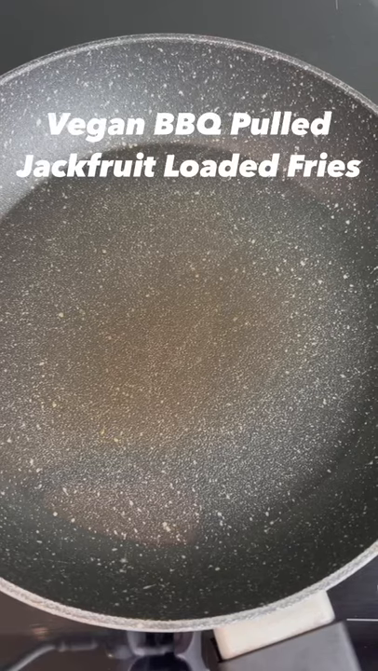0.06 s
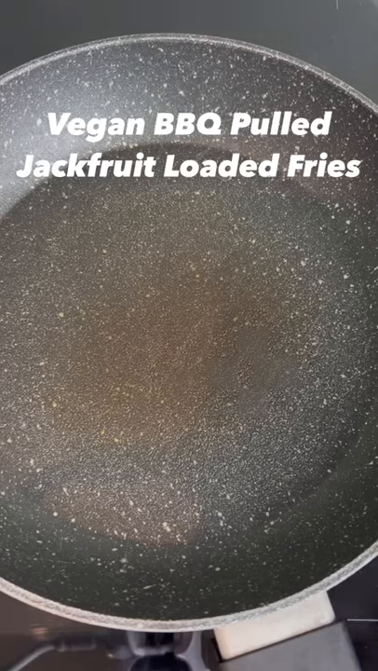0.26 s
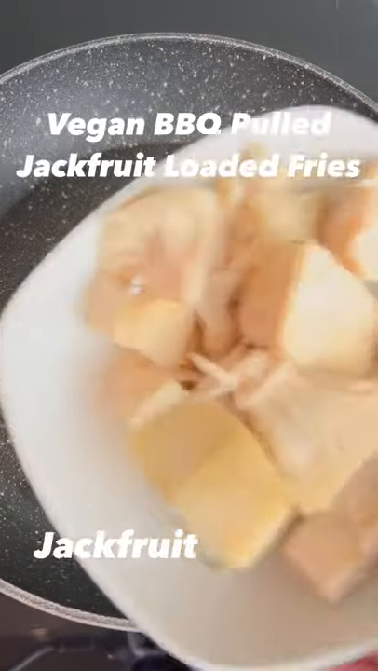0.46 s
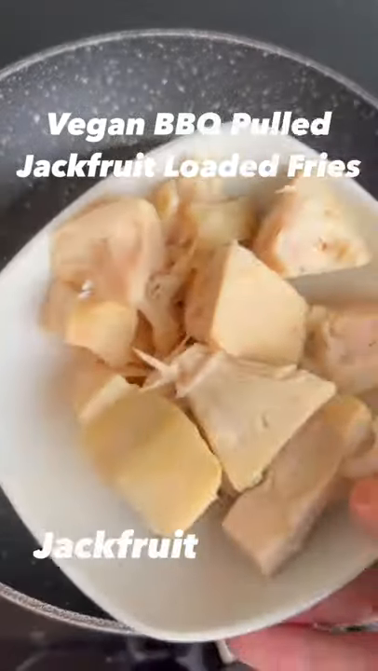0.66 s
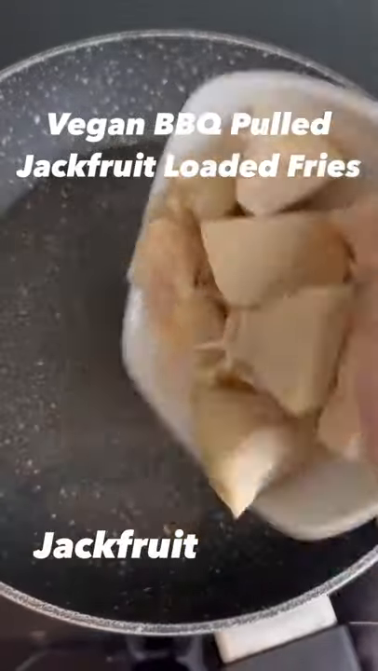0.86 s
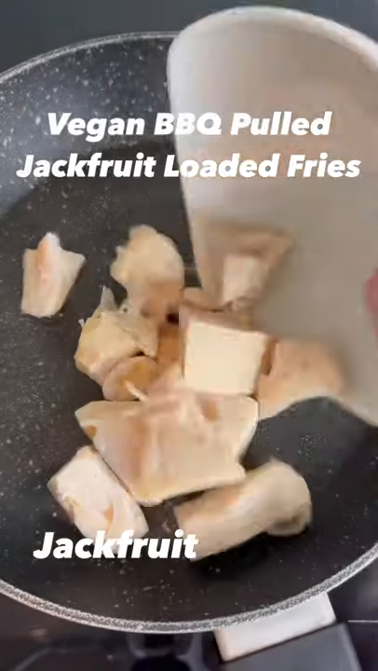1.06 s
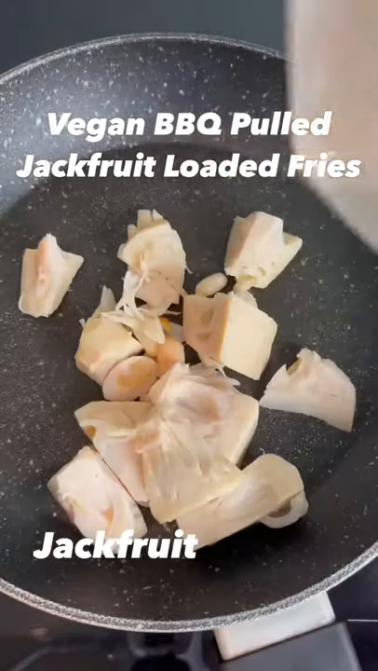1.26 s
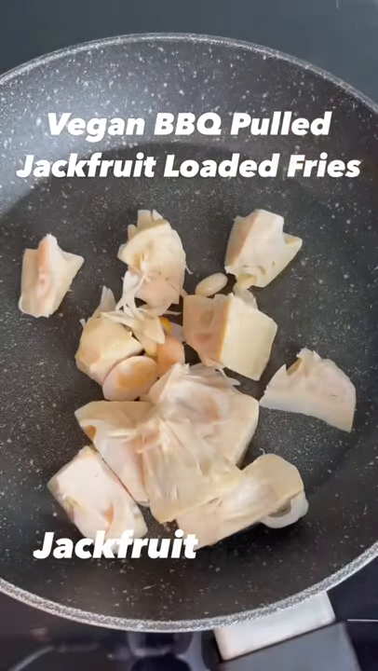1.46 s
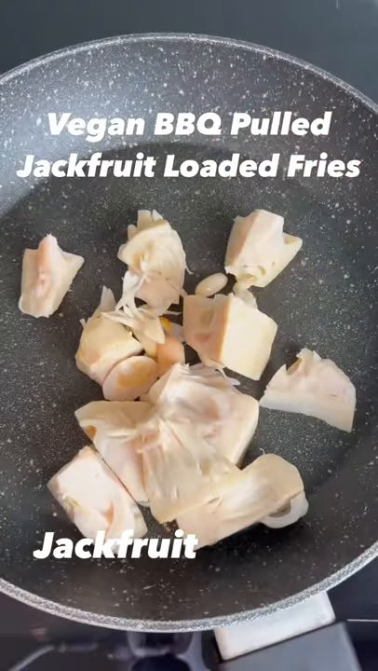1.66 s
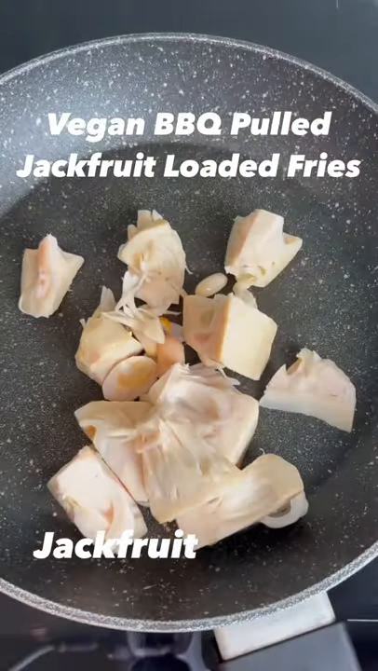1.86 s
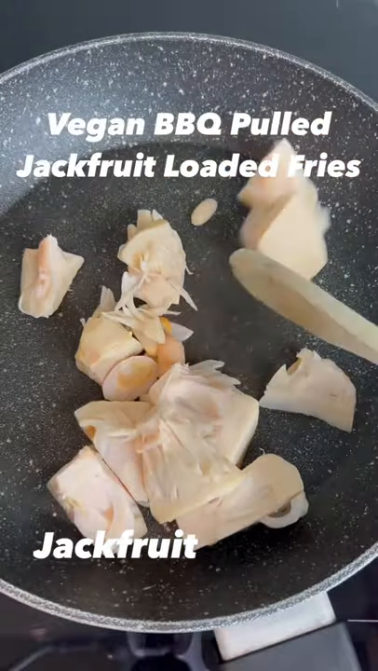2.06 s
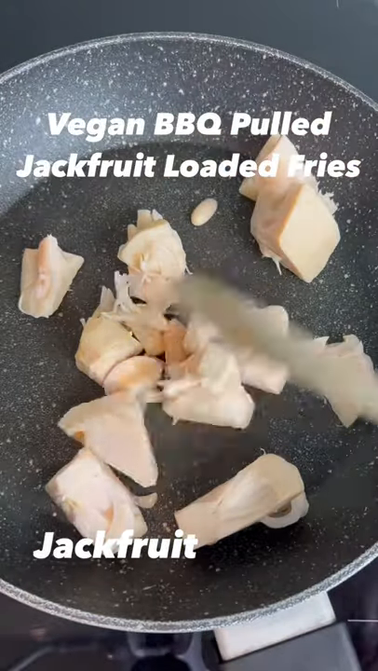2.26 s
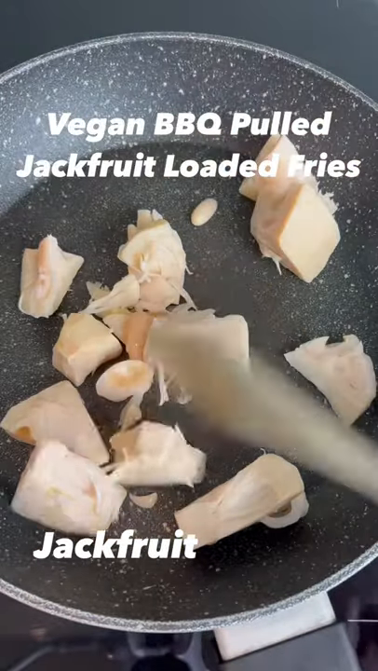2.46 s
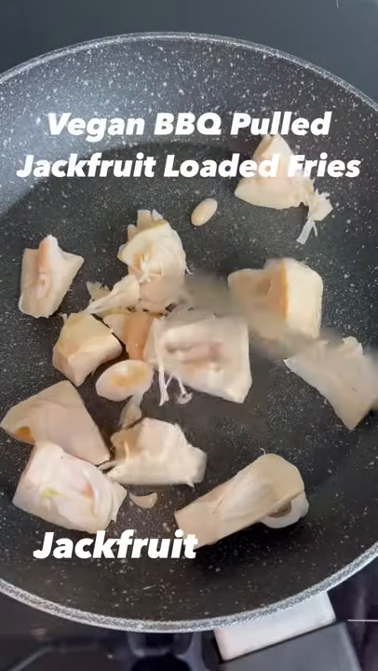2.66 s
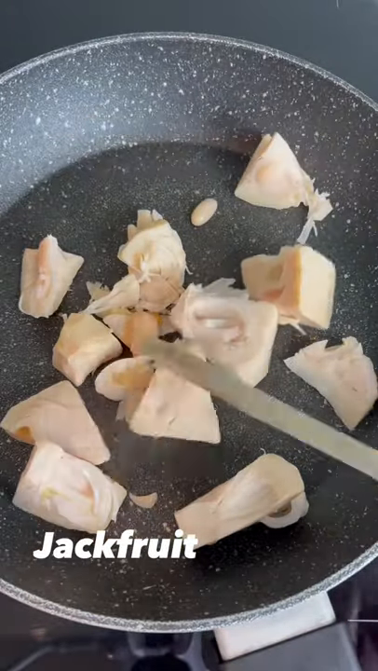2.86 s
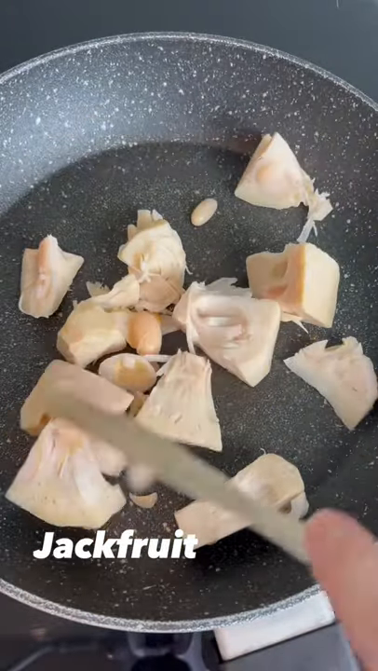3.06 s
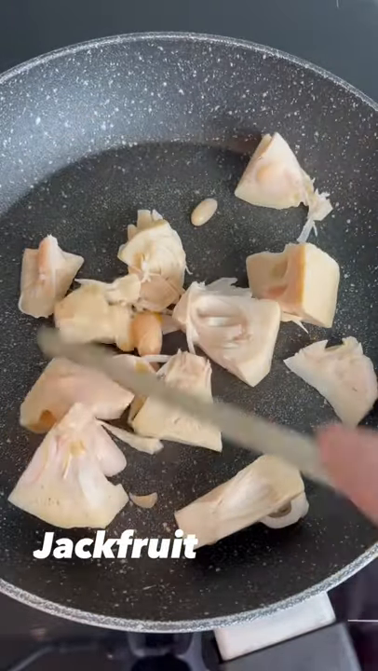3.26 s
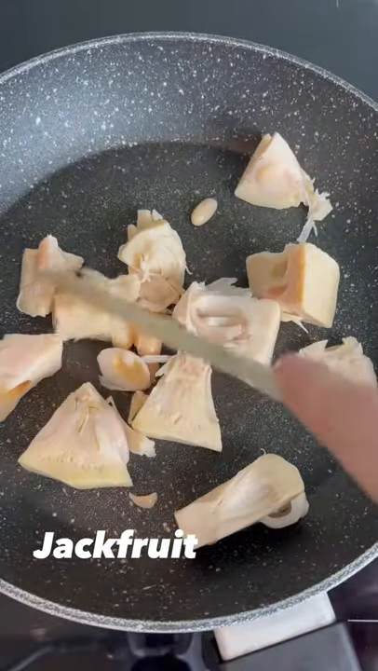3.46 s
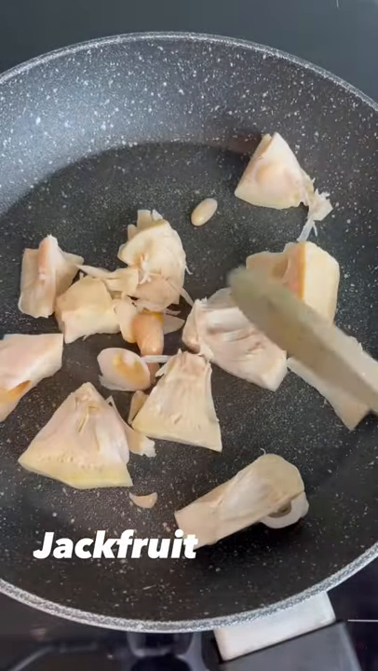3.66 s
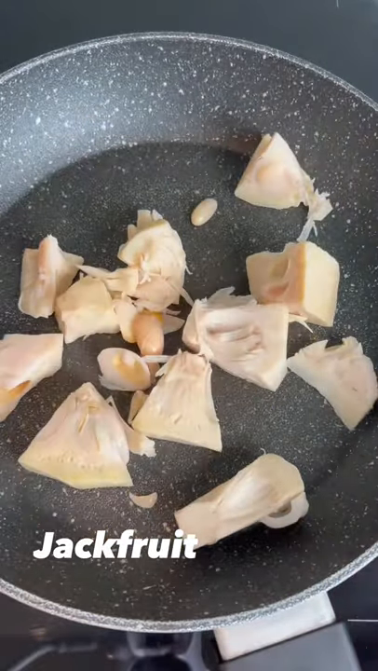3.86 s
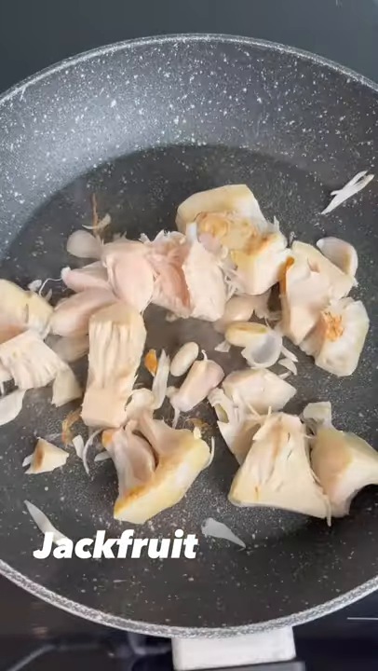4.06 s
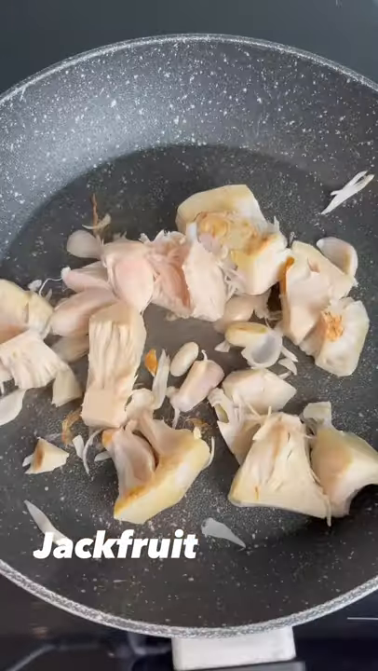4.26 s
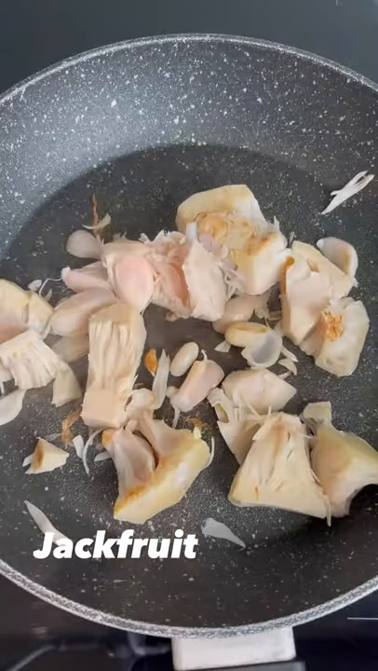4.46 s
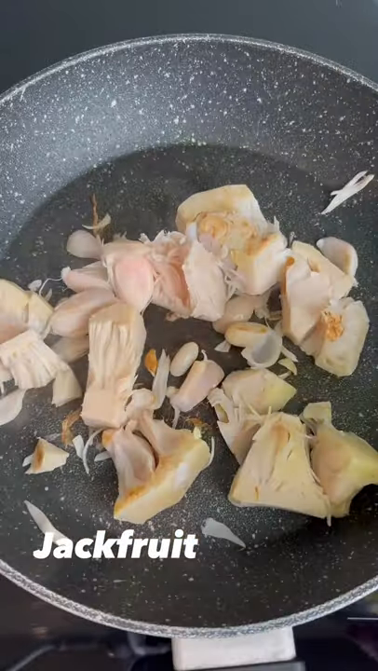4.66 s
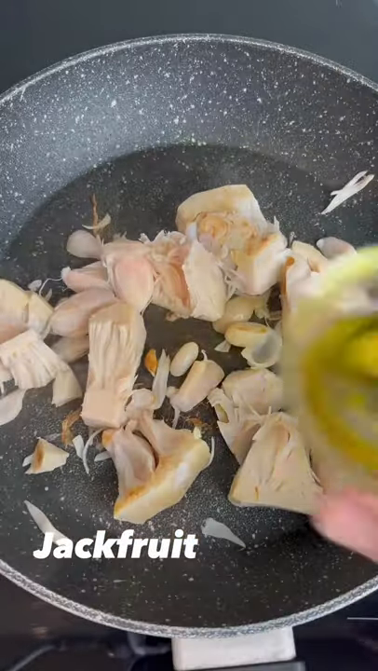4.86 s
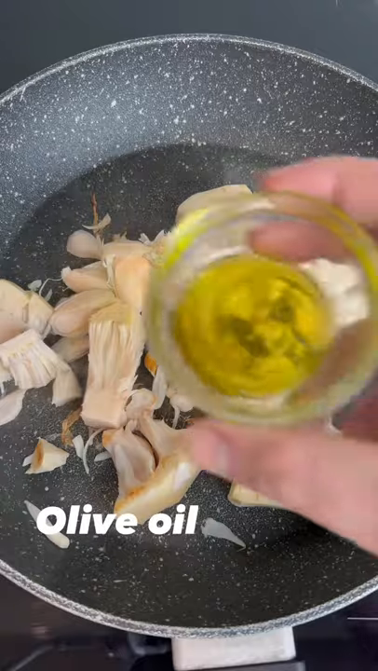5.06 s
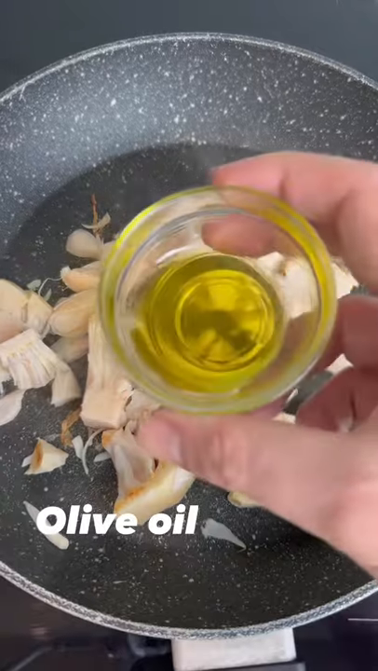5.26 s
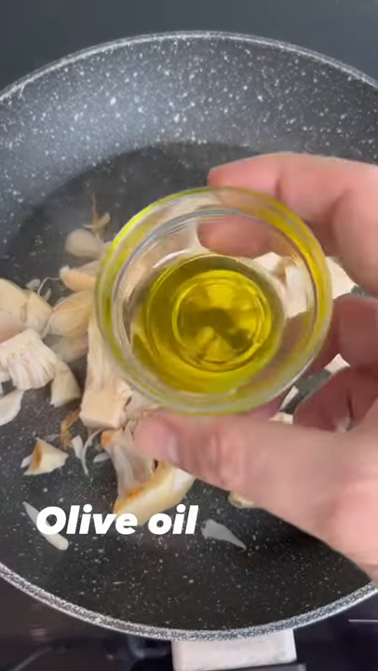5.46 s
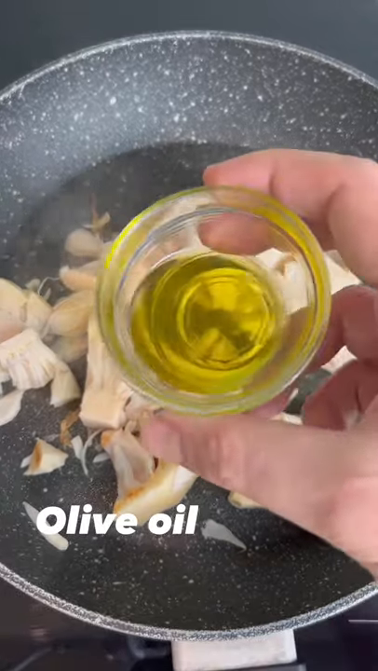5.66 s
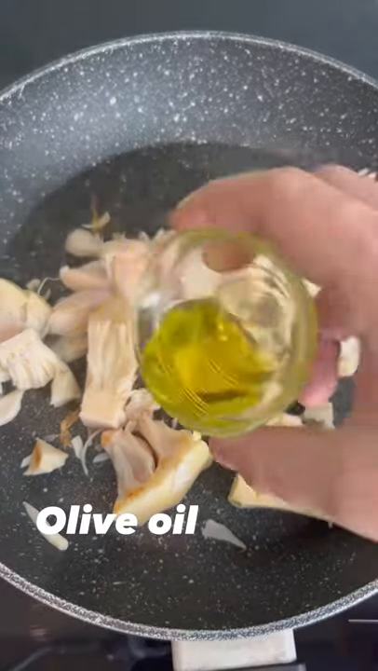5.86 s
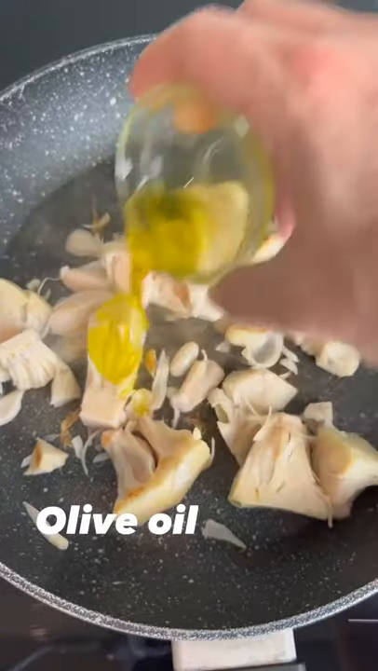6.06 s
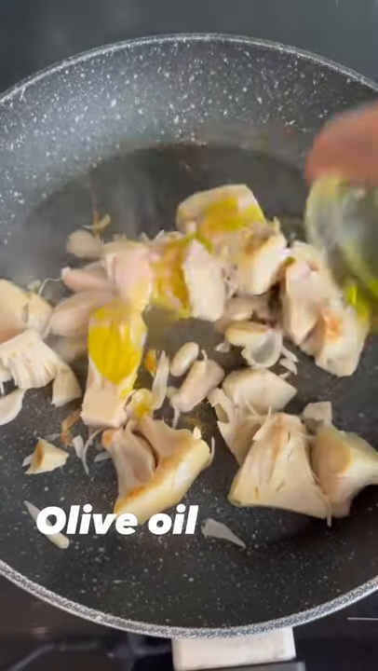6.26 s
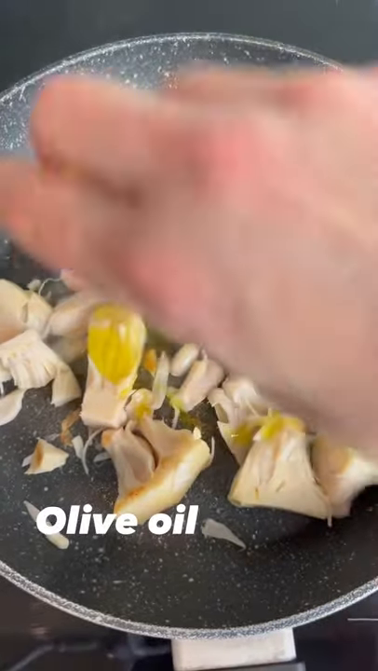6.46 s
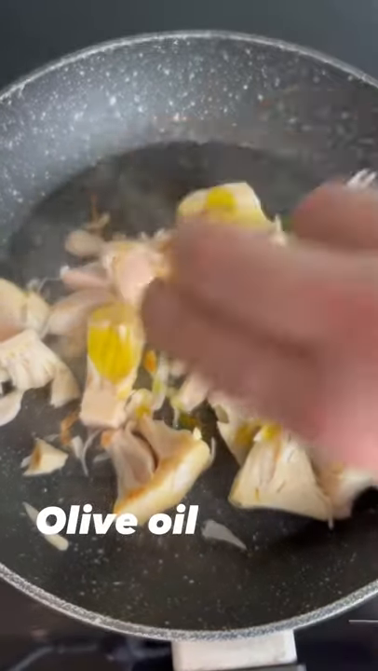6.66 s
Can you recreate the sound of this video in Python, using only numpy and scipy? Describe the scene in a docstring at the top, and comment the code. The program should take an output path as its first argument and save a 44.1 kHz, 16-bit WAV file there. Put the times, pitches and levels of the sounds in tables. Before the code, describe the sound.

A humming, faintly buzzing hob, very close up, with barely audible handling at first. Moist chunks tumble into a pan with muffled low bumps and instant, dense, hissing fry, full of sharp crackles and thin whistling steam. The sizzle drops abruptly at a cut, swells as pieces are moved, then drops again as low fan noise appears. It simmers down until fresh oil revives a spitting, uneven sizzle to the end.

```python
"""Three shots: in the first, over a humming, buzzing hob, soft rustling comes before wet food thuds into a
pan and sizzles; then come stirring and, with a fan running in the last shot, a late flare under oil.
Frying is steam-burst clicks over hiss, with spits and ringing bubbles; squeals are resonant noise, thuds are
decaying pan tones; hum, buzz and fan mix tones with shaped noise. The sizzle is wide only in some bands;
near 12 kHz the centre ends, leaving only the out-of-phase part in the top treble."""
import sys
import numpy as np
from scipy import signal
from scipy.fft import rfft, irfft, next_fast_len
from scipy.io import wavfile
from scipy.ndimage import uniform_filter1d, map_coordinates

SR = 44100
rng = np.random.default_rng(int(sys.argv[2]) if len(sys.argv) > 2 else 0)


def unload_audio(sound):
    """Save the sound as a 16-bit wav file, at the path given as the first command line argument."""
    columns = np.transpose(np.atleast_2d(sound))
    # keep every value between -1 and 1, then stretch to whole-number steps
    steps = np.round(np.clip(columns, -1, 1) * 32767)
    wavfile.write(sys.argv[1], SR, steps.astype(np.int16))


N = 295911
T = np.arange(N) / SR

# how hard the pan boils as food lands, is stirred, calms and flares: (time [s], relative fizz level [dB])
FRYING_LEVEL = [(0.958, -76), (0.971, -45), (0.98, -43), (0.993, -40.5), (1.006, -33.5), (1.045, -34),
                (1.11, -29), (1.27, -27.5), (1.92, -31), (1.94, -39.5), (2.0, -37), (2.15, -41.5),
                (2.25, -36), (2.285, -35.5), (2.305, -31.5), (2.325, -36), (2.5, -38.5), (2.67, -35.5),
                (3.14, -36), (3.16, -33), (3.45, -36), (4.02, -38), (4.05, -44.5), (4.57, -41.5),
                (5.65, -46), (6.08, -45.5), (6.264, -38), (6.278, -39.5), (6.32, -40), (6.35, -37.5),
                (6.39, -36.5), (6.415, -40), (6.445, -34.5), (6.48, -37.5), (6.51, -35), (6.57, -35.5),
                (6.6, -35.5), (6.63, -33.5), (6.66, -34.5), (6.71, -35.5)]
# sizzle colour in the centre, then out of phase: (frequency [Hz], relative density [dB])
CENTRE_COLOUR = [(300, -25), (560, -15.5), (1000, -15.5), (2030, -7), (3270, -4.5), (4300, -3.5),
                 (4700, -4.5), (5050, -8), (5450, -2), (6100, 0.5), (8300, 0), (9800, -3.5), (11400, -1.5),
                 (12500, -5.5)]
WIDE_COLOUR = [(3900, -70), (4300, -10.5), (4900, -6), (5500, -7), (5900, -60), (7900, -62), (8400, -3.5),
               (10200, -8.5), (11000, 2), (12000, 3.5), (13800, -5), (15900, 5.5)]
# single loud spits before colouring: (time [s], relative level [dB])
SPITS = [(0.6355, -49), (1.0314, -29), (1.2224, -15), (1.3464, -14), (2.259, -22), (2.2698, -24),
         (2.2982, -17), (2.3084, -21), (2.3634, -27), (3.3464, -29), (3.6644, -32), (4.555, -31),
         (6.2494, -27), (6.4024, -27), (6.4414, -20), (6.5034, -30), (6.6774, -31)]
# steam squealing or spluttering from under a chunk: (time [s], length [s], frequency [Hz], relative level [dB])
STEAM_JETS = [(1.033, 0.88, 3300, -44), (1.085, 0.24, 2380, -45.5), (1.333, 0.63, 2390, -50),
              (2.295, 0.028, 8100, -39.5), (2.299, 0.03, 3860, -37), (2.298, 0.13, 3760, -45),
              (2.791, 0.09, 3250, -46.5), (5.806, 0.38, 3180, -65), (6.27, 0.016, 4500, -44),
              (6.331, 0.33, 1720, -54.5), (6.42, 0.19, 1900, -52.5), (6.341, 0.014, 3700, -42.5),
              (6.346, 0.017, 6900, -38), (6.37, 0.022, 5630, -41), (6.45, 0.14, 5800, -42.5),
              (6.599, 0.014, 4530, -41), (6.625, 0.11, 6250, -41.5)]
# chunks and spatula meeting the pan:
# (time [s], relative level [dB], rocking pitch [Hz], tap level above it [dB], tap pitch [Hz])
PAN_BLOWS = [(0.932, -31, 48, -24, 250), (0.97, -41, 70.5, -1, 300), (0.993, -26, 62.4, -14, 189),
             (1.028, -33, 55, -19, 200), (1.083, -45.5, 70, 6, 750), (1.108, -30, 60.6, -24, 250),
             (1.132, -36, 65.4, -5.5, 200), (1.186, -32.5, 69.3, -19, 300), (1.216, -38, 76.4, -5, 217),
             (2.547, -41.5, 65.3, -26, 250), (3.357, -39, 64, -14.5, 250), (3.607, -39.5, 59.4, -28, 250)]
# partials of the rocking pan: (multiple of rocking pitch [ratio], relative level [dB], T60 [s])
PAN_PARTIALS = [(1, -3, 0.13), (2.1, -7.5, 0.069), (3.7, -18, 0.041)]
# hum overtones: (multiple of hum pitch [ratio], relative level [dB])
HUM_OVERTONES = [(2, -5), (3, 0), (4, -2), (5, -4.5), (6, -4.5), (7, -2.5)]
# colour of the hob's buzz: (frequency [Hz], relative density [dB])
BUZZ_COLOUR = [(2500, -63), (3600, 1.5), (4300, 4), (4800, -9), (5300, 2), (6800, -2.5), (7400, 3.5),
               (8300, 3), (8700, -5), (9200, 3.5), (9500, -12), (10100, -14), (11000, 0), (12500, -29)]
# colours of the room air and the fan's rush: (frequency [Hz], relative density [dB])
AIR_COLOUR = [(15, -47), (30, -4), (50, 4), (75, -1), (150, -7.5), (230, -9), (310, -18.5), (550, -21),
              (700, -25), (800, -39.5), (3000, -55.5), (9000, -74)]
FAN_COLOUR = [(60, 8), (200, 4), (500, 4), (1000, 2), (1300, 3), (3000, -7.5), (4500, -43)]
# fan blade tones: (multiple of shaft rate [ratio], level relative to the fan's rush [dB])
BLADE_TONES = [(3, -11.5), (4, -9.5), (6, -15.5), (8, -8.5)]
# wavering low tone: (frequency [Hz], average level [dB])
DRONE_TONES = [(229.2, -68.5)]
# stereo spread of air and fan: (frequency [Hz], left-right likeness [correlation])
LIKENESS = [(60, .999), (150, 0.98), (300, 0.82), (700, 0.38), (1200, 0.96), (1500, 1)]
# thin steady whines: (frequency [Hz], centre level [dB], out-of-phase level [dB])
WHINES = [(1890, -96, -125), (9200, -96, -88)]
# the three shots: (start [s], sizzle body above fizz [dB], sizzle width [dB], hum level [dB],
# hum overtone level [dB], air level [dB], fan level [dB])
SHOTS = [(0, -5.5, -1, -51, -70.5, -56, -110), (1.93, -4, -1, -52, -76.5, -59, -110),
         (4.029, -1.5, 1, -48, -74, -59, -54)]
# hand and bowl before the food falls: (time [s], length [s], dull level [dB], crisp level [dB]), all relative
HAND_MOVES = [(0.007, 0.024, -71, -62.5), (0.04, 0.068, -78, -80), (0.312, 0.05, -77, -77),
              (0.645, .063, -77, -79), (0.739, 0.06, -80, -80), (0.846, .022, -74, -71),
              (0.914, 0.02, -67.5, -67)]
# slow drift of the mains hum: (time [s], frequency [Hz])
MAINS_DRIFT = [(0, 99.93), (1.5, 100.0), (3, 100.1), (6.71, 100.2)]
# level ride on the middle of the sizzle body: (time [s], gain [dB])
MIDDLE_RIDE = [(0.95, 2), (1.5, 1.5), (1.93, -0.5), (3, -2), (4.03, 0), (4.1, 1), (4.7, 0), (5.0, 0),
               (5.5, -1), (5.9, -1), (6.1, -1), (6.4, -4), (6.71, 0)]
# freshly landed food boiling in spurts: (time [s], gain over the steady sizzle [dB])
FOOD_SPURTS = [(1.12, 2.5), (1.218, 3), (1.308, 0.5), (1.414, 4), (1.497, 4), (1.542, 2.5), (1.698, 1.5),
               (1.736, 5.5), (1.785, 3)]

LAST_SHOT = T > SHOTS[-1][0]
CUT_S = 0.0053  # one shot fades into the next
LAND_S, THIN_DB, FILL_S = 1.023, -8.5, 0.064  # the first steam is thin; the body fills in after landing
OIL_S, OIL_SPREAD_S = 6.15, 0.2
BODY_GROWS = 0.68  # dB of body per dB of fizz, so flares are bright
DROPLETS_DB, OIL_DROPLETS_DB = -16, -19  # under the fizz: always present, plus more from fresh oil
POPS_DB, POPS_HZ = -23, 895  # larger drops reach down into the body
SPIT_T60_S, SPIT_WIDE_DB = 0.0009, 3
SPIT_RING_HZ, SPIT_RING_DB, SPIT_RING_T60_S = 8000, -7.5, 0.006
MIDDLE_HZ = (2100, 3700)
LOW_HZ, DRY_DB, OILY_DB = 2480, -3, 2  # in the last shot the low body is thin, then fills under oil
NOTCH_HZ, NOTCH_WIDTH_HZ, NOTCH_DB = 4980, 180, -1.5
SPURT_S = 0.0069  # bell width parameter
STEADY_S, STEADY_WIDTH, JET_WIDTH = 0.15, 0.035, 0.08  # longer jets whistle narrower; widths are ratios of pitch
TICK_S, TICK_DB, TICK_HZ, TICK_T60_S = 0.9335, -38, 1040, 0.012
RUSTLE_ATTACK_S, RUSTLE_T60_S = 0.0099, 0.13
STILL_DULL_DB, STILL_CRISP_DB, STILL_SIDE_DB = -99, -90, -83  # the faint rustle between moves
OVERTONE_WAVER_DB, BLADE_WAVER_DB, SHAFT_HZ = 0.5, 2.1, 122.16
CENTRE_HZ, TOP_HZ = 12450, 16100  # where the centre ends, and where everything ends


def sizzle():
    """Water boils off in the fat: a bright fizz over a lower body, with some bands spread wide."""
    fizz_db, body_db, wide_db = frying()
    steam, spray = steam_bed(fizz_db), spits() + droplets(fizz_db)
    spray = filtered(spray, lambda hz: above(hz, 5300, order=4))  # tiny droplets crack in the treble only
    centre = steam[0] + spray[0] + pops(fizz_db)
    fizz = filtered(centre, lambda hz: amp(along(CENTRE_COLOUR, hz)) * above(hz, 6120))
    body = sizzle_body(centre)
    wide = out_of_phase(steam[0] + spray[1], steam[1] + spray[1], wide_db)
    return amp(4) * (fizz + amp(body_db + 6) * spurts() * body + wide)


def steam_bed(fizz_db):
    """Bubbles burst in clumps of a few milliseconds, louder wherever a patch of the pan boils harder."""
    flutter = amp(fizz_db + 0.5 * wobble(22))
    flutter = flutter * amp(0.78 * wobble(500))
    pair = np.array([bursts(3.0, 0.13, count=20000), bursts(3.0, 0.17, count=20000)])
    pair[0] += amp(-18.5) * bubbles(5935, 0.598, 14.0, 6.5, count=9000)
    # broad quick patches, then narrow lasting ones where hollows under the food resonate
    pair = patchy(pair, 0.73, size=256, bins=2.2, frames=3)
    pair = patchy(pair, 2.18, size=1024, bins=1.6, frames=7)
    return pair * flutter


def spits():
    """Each loud spit is a noisy crack, and the pocket it leaves rings briefly."""
    out, t = np.zeros((2, N)), T[:400]
    for s, db in SPITS:
        crack = amp(-60 * t / SPIT_T60_S) * rng.choice([-1, 1], len(t))
        ring_hz = SPIT_RING_HZ * np.exp(rng.normal(0, 0.1))
        ring = amp(SPIT_RING_DB - 60 * t / SPIT_RING_T60_S) * np.sin(2 * np.pi * ring_hz * t)
        out[:, round(s * SR):][:, :len(t)] += amp([[db], [db + SPIT_WIDE_DB]]) * (crack + ring)
    return out


def droplets(fizz_db):
    """Sparse droplets click under the fizz, stronger once fresh oil spreads."""
    level = amp(DROPLETS_DB) + amp(OIL_DROPLETS_DB) * oiliness()
    clicks = amp(fizz_db + 2.0 * wobble(6.9)) * level * bursts(7.0, 1, count=1500)
    return clicks * amp([[-4], [2]])


def pops(fizz_db):
    """Larger drops burst as sparse, lower clicks."""
    drops = bursts(5.0, 0.99, count=500)
    drops = filtered(drops, lambda hz: above(hz, POPS_HZ, order=4) * (1 - above(hz, 4600, order=2)))
    return amp(fizz_db + POPS_DB) * unit(drops)


def sizzle_body(centre):
    """The lower sizzle has a ridden middle; in the last shot it dips at the notch and its low end shifts."""
    body = filtered(centre, lambda hz: amp(along(CENTRE_COLOUR, hz)) * (1 - above(hz, 6230)))
    low = filtered(body, lambda hz: above(hz, 720, order=4) * (1 - above(hz, LOW_HZ)))
    middle = filtered(body, lambda hz: above(hz, MIDDLE_HZ[0]) * (1 - above(hz, MIDDLE_HZ[1])))
    notch = filtered(body, lambda hz: np.exp(-((hz - NOTCH_HZ) / NOTCH_WIDTH_HZ) ** 2))
    low_db = LAST_SHOT * (DRY_DB + (OILY_DB - DRY_DB) * oiliness())
    body = body + (amp(curves(MIDDLE_RIDE)[0]) - 1) * middle
    return body + (amp(NOTCH_DB) - 1) * notch * LAST_SHOT + (amp(low_db) - 1) * low


def frying():
    """Fizz, body and width levels; the fizz waits at a negligible level until the food lands."""
    fizz_db, = curves([(FRYING_LEVEL[0][0] - 0.01, -110)] + FRYING_LEVEL)
    body_db, wide_db = shots()[:2]
    shot = np.searchsorted([s for s, *_ in SHOTS], T, "right")
    medians = [np.median(fizz_db[(shot == k) & (T > LAND_S)]) for k in range(1, len(SHOTS) + 1)]
    usual_db = np.array(medians)[shot - 1]
    flare_db = np.clip(fizz_db - usual_db, -6, 10)
    thin_db = THIN_DB * np.exp(-np.maximum(T - LAND_S, 0) / FILL_S)
    return fizz_db, body_db + (BODY_GROWS - 1) * flare_db + thin_db, wide_db


def oiliness():
    """Fresh oil spreads from none to full."""
    return np.clip((T - OIL_S) / OIL_SPREAD_S, 0, 1)


def spurts():
    """Gain swells on the lower sizzle and squeals as pockets of steam break out."""
    return amp(sum(db * np.exp(-((T - s) / SPURT_S) ** 2) for s, db in FOOD_SPURTS))


def bursts(spread_db, share, count):
    """Steam bubbles bursting: clicks of uneven size over a bed of hiss."""
    when, size = rng.random((2, count))
    size_db = np.minimum(-spread_db * np.log(1 - size), 12)
    clicks = np.bincount((when * N).astype(int), amp(size_db) * rng.choice([-1, 1], count), N)
    share = np.clip(share, 0, 1)
    return np.sqrt(share) * unit(clicks) + np.sqrt(1 - share) * rng.standard_normal(N)


def bubbles(centre_hz, spread, cycles, spread_db, count):
    """Pockets of steam that ring for some cycles, their pitch rising as they open."""
    when, size, pitch = rng.random(count), rng.exponential(1, count), rng.standard_normal(count)
    hz = np.clip(centre_hz * np.exp(spread * pitch), 800, 15000)[:, None]
    turns, cycles = np.float32(hz * T[:400]), np.float32(cycles)
    tone = np.sin(np.float32(2 * np.pi * turns * (1 + 0.0024 * turns)))
    fade = np.float32(np.hanning(800)[400:])
    ring = tone * turns / cycles * np.exp(-turns / cycles) * fade
    ring *= amp(np.minimum(spread_db * size, 15))[:, None] * np.sqrt(hz)
    at = (when * N).astype(int)[:, None] + np.arange(400)
    return unit(np.bincount(at.ravel(), ring.ravel(), N + 400)[:N])


def squeals():
    """Each jet of steam is noise in one narrow resonance."""
    out = np.zeros(N + SR)
    for s, length, hz, db in STEAM_JETS:
        n = round(length * SR)
        m = next_fast_len(n + SR // 10)
        width_hz = (STEADY_WIDTH if length > STEADY_S else JET_WIDTH) * hz
        resonance = 1 / (1 + ((np.fft.rfftfreq(m, 1 / SR) - hz) / width_hz) ** 2)
        jet = irfft(rfft(rng.standard_normal(m)) * resonance, m)
        swell = np.sin(np.pi * np.arange(n) / n) ** 0.41
        out[round(s * SR):][:n] += amp(db) * swell * unit(jet[:n])
    return out[:N] * spurts()


def thuds():
    """Soft blows rock the pan on the hob, with a dull tap on top."""
    out, t = np.zeros(N + SR), T[:SR // 4]
    for s, db, rock_hz, tap_db, tap_hz in PAN_BLOWS:
        ring = sum(amp(level - 60 * t / t60) * np.sin(2 * np.pi * k * rock_hz * t)
                   for k, level, t60 in PAN_PARTIALS)
        soft = signal.butter(2, [0.5 * tap_hz, 1.48 * tap_hz], "bandpass", fs=SR, output="sos")
        noise = signal.sosfilt(soft, rng.standard_normal(len(t)))
        tap = amp(tap_db - 60 * t / 0.092) * noise / noise[:SR // 50].std()
        out[round(s * SR):][:len(t)] += amp(db) * (ring + tap) * (1 - np.exp(-t / 0.0039))
    return out[:N]


def tick():
    """The first chunk clicks on the rim: a short ring with a crack on it."""
    t = np.maximum(T - TICK_S, 0)
    noise = filtered(rng.choice([-1., 1.], N), lambda hz: 1 - 0.28 * above(hz, 4000, order=4))
    crack = 1.3 * amp(-60 * t / 0.021) * noise
    ring = amp(-60 * t / TICK_T60_S) * np.sin(2 * np.pi * TICK_HZ * t)
    return amp(TICK_DB) * (1 - np.exp(-t / 0.00082)) * (ring + crack)


def rustle():
    """Fingers shift on the bowl as dull and crisp friction noise, a little different left and right."""
    before = T < LAND_S
    dull, crisp = amp(STILL_DULL_DB) * before, amp(STILL_CRISP_DB) * before
    for s, length, dull_db, crisp_db in HAND_MOVES:
        release = amp(-60 * np.maximum(T - s - length, 0) / RUSTLE_T60_S)
        shape = np.clip((T - s) / RUSTLE_ATTACK_S, 0, 1) * release
        dull, crisp = dull + amp(dull_db) * shape, crisp + amp(crisp_db) * shape
    dull, crisp = dull * amp(1.4 * wobble(60)), crisp * amp(1.2 * wobble(60.3))

    def band(lo, hi):
        """Grainy friction noise between two edges."""
        grains = bursts(2.6, 0.42, count=8000)
        return unit(filtered(grains, lambda hz: above(hz, lo) * (1 - above(hz, hi, order=16))))

    side = amp(-11) * crisp * band(1500, 5800) + amp(STILL_SIDE_DB) * band(700, 6400) * before
    centre = dull * band(560, 2230) + crisp * band(1900, 8200)
    wide = amp(3) * dull * out_of_phase(*rng.standard_normal((2, N)), 0)
    return centre + side * [[1], [-1]] + wide


def buzz():
    """The hob's coil: a comb of fine lines on the mains, over hiss partly gated by the same cycle."""
    k = np.arange(30, 96)
    scatter_db, start = 7 * rng.uniform(-1, 1, len(k)), rng.random(len(k))
    turn = np.linspace(0, 1, 8192)
    lines = np.sin(2 * np.pi * (k[:, None] * turn + start[:, None]))
    cycle = amp(along(BUZZ_COLOUR, k * MAINS_DRIFT[0][1]) + scatter_db) @ lines
    comb = unit(np.interp(mains() % 1, turn, cycle))
    # the coil's iron hisses most at the current peaks
    gated = unit(rng.standard_normal(N) * (1 + 1.1 * np.cos(2 * np.pi * mains())))
    lower = filtered(gated, lambda hz: amp(along(BUZZ_COLOUR, hz)) * (1 - above(hz, 9600, order=40)))
    even = filtered(rng.standard_normal(N), lambda hz: amp(along(BUZZ_COLOUR, hz)) * above(hz, 9400, order=40))
    hiss = unit(lower + patchy(even, 3, size=512, bins=4, frames=8))
    whine = sum((amp(db) + amp(side_db) * np.array([[1], [-1]])) * np.sin(2 * np.pi * hz * T)
                for hz, db, side_db in WHINES)
    flickering = amp(-74.5) * patchy(comb, 3.0, size=1024, bins=2, frames=8)
    wide = amp(-77) * out_of_phase(gated, rng.standard_normal(N), 0)
    return flickering + amp(-81.5) * hiss + np.sqrt(2) * whine + wide


def mains_hum():
    """A drifting mains tone with gently wavering overtones."""
    hum_db, over_db = shots()[2:4]
    phase = 2 * np.pi * mains()
    root = amp(hum_db + 0.93 * wobble(7.1)) * np.sin(phase)
    overtones = sum(amp(over_db + db + OVERTONE_WAVER_DB * wobble(3.5)) * np.sin(k * (phase + 0.66))
                    for k, db in HUM_OVERTONES)
    return np.sqrt(2) * (root + overtones)


def fan():
    """Rushing air carries wavering blade tones at multiples of the shaft rate."""
    blades = sum(amp(db + BLADE_WAVER_DB * wobble(9)) * drifting(k * SHAFT_HZ, 0.75) * amp([[-2.5], [2.5]])
                 for k, db in BLADE_TONES)
    return amp(shots()[5]) * (rush(FAN_COLOUR) + np.sqrt(2) * blades)


def drone():
    """A low sine wavers in pitch and level."""
    return np.sqrt(2) * sum(amp(db + 2.6 * wobble(13)) * drifting(hz, 2.46) for hz, db in DRONE_TONES)


def room_air():
    """Low room noise, more alike left and right in the deep bass than in the low mids."""
    return amp(shots()[4]) * rush(AIR_COLOUR)


def hollow():
    """The room answers the frying with a dull wash, opposite in phase left and right."""
    wash = filtered(rng.standard_normal(N), lambda hz: above(hz, 180, order=4) * (1 - above(hz, 1240, order=40)))
    return amp(frying()[0] - 31.0) * unit(wash) * [[1], [-1]]


def shots():
    """One value per sample for each column of the shots, blended over the cuts."""
    rows = []
    for k, (s, *levels) in enumerate(SHOTS):
        rows += [(s, *SHOTS[max(k - 1, 0)][1:]), (s + CUT_S, *levels)]
    return curves(rows)


def mains():
    """Cycles of the slowly drifting hum."""
    return np.cumsum(curves(MAINS_DRIFT)[0]) / SR


def drifting(hz, width_hz):
    """A sine whose pitch wanders."""
    return np.sin(2 * np.pi * np.cumsum(hz + width_hz * wobble(12)) / SR)


def rush(spectrum):
    """Stereo noise of rms 1, shared between sum and difference to set the left-right likeness."""
    def response(hz):
        turn = np.arccos(np.clip(along(LIKENESS, hz), -1, 1)) / 2
        return amp(along(spectrum, hz)) * [np.cos(turn), np.sin(turn)]

    mid, side = filtered(rng.standard_normal((2, N)), response)
    return unit(np.array([mid + side, mid - side]))


def patchy(x, depth_db, size, bins, frames):
    """Random gain patches over frequency and time make the colour flicker."""
    z = signal.stft(x, nperseg=size)[2]
    field = rng.standard_normal(z.shape[-2:])
    field = uniform_filter1d(field, max(round(bins), 1), axis=0)
    field = uniform_filter1d(field, max(round(frames), 1), axis=1)
    return signal.istft(z * amp(depth_db * unit(field)), nperseg=size)[1][..., :N]


def out_of_phase(centre, apart, wide_db):
    """Opposite left and right, in some bands only: a quarter-cycle lag of one signal plus a second signal."""
    lagging = filtered(centre, lambda hz: -1j * amp(along(WIDE_COLOUR, hz))) * 0.81
    own = filtered(apart, lambda hz: amp(along(WIDE_COLOUR, hz))) * 0.83
    return amp(wide_db) * (lagging + own) * [[1], [-1]]


def amp(db):
    """Decibels to amplitude."""
    return 10 ** (np.asarray(db) / 20)


def unit(x):
    """Scale to rms 1."""
    return x / np.sqrt(np.mean(x ** 2) + 1e-20)


def along(points, hz):
    """Read (frequency [Hz], value) points on a log frequency axis."""
    f, v = np.transpose(points)
    return np.interp(np.log(hz + 1), np.log(f + 1), v)


def curves(rows):
    """One value per sample for each column after the time."""
    s, *cols = np.transpose(rows)
    return [np.interp(T, s, c) for c in cols]


def wobble(rate):
    """A smooth random curve, rate knots a second."""
    return map_coordinates(rng.standard_normal(int(N * rate / SR) + 4), [T * rate])


def filtered(x, response):
    """Shape x by a complex response of frequency."""
    m = next_fast_len(N + SR // 2)
    return irfft(rfft(x, m) * response(np.fft.rfftfreq(m, 1 / SR)), m)[..., :N]


def above(hz, edge_hz, order=8):
    """A smooth step from 0 to 1 at the edge."""
    return 1 / (1 + (edge_hz / (hz + 1)) ** order)


def scene():
    """Mix the frying, the handling and the kitchen behind them."""
    food = sizzle() + squeals() + thuds() + tick() + rustle()
    return food + buzz() + mains_hum() + fan() + drone() + room_air() + hollow()


def record(dry):
    """The centre of the image ends early; nothing passes above the band limit."""
    keep = lambda hz: np.array([1 - above(hz, CENTRE_HZ, order=120), hz < TOP_HZ])
    mid, side = filtered(np.array([dry[0] + dry[1], dry[0] - dry[1]]) / 2, keep)
    return np.array([mid + side, mid - side])


dry = scene()
out = record(dry)
unload_audio(out)
```